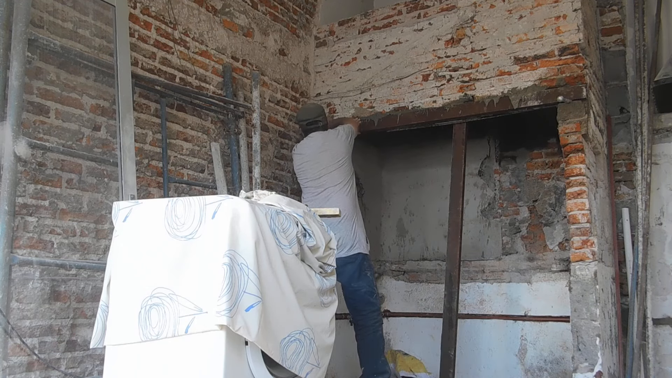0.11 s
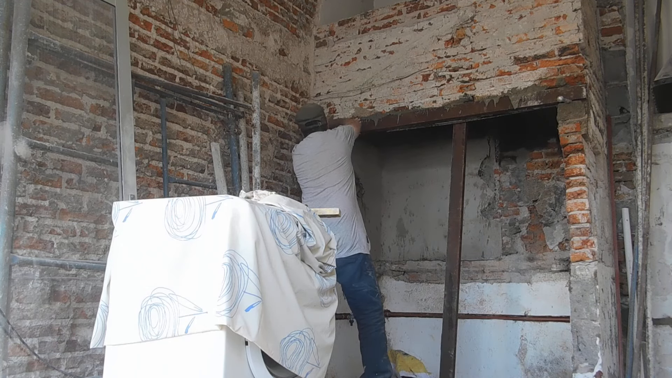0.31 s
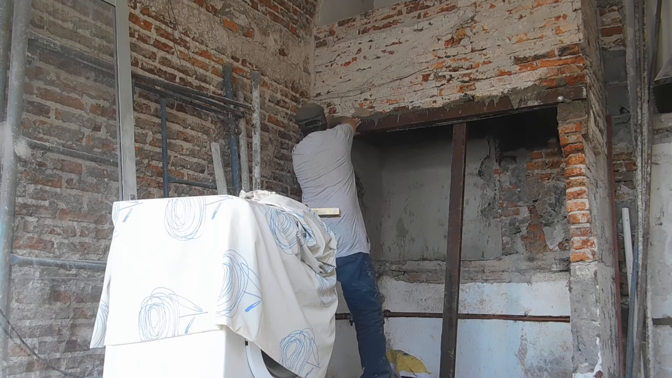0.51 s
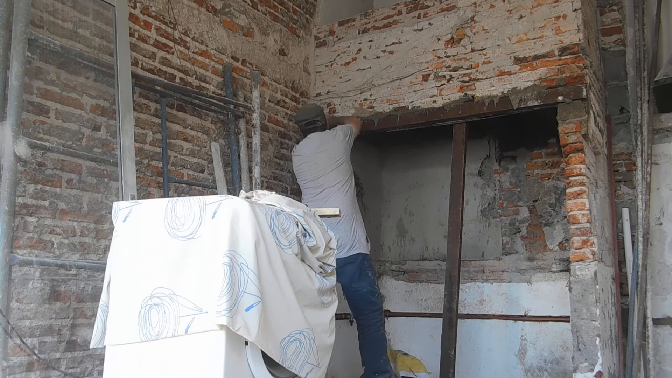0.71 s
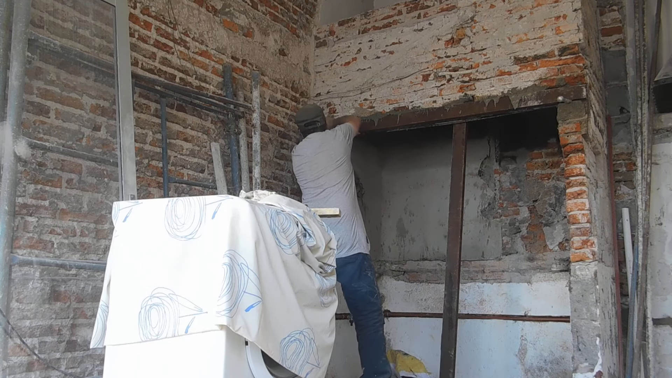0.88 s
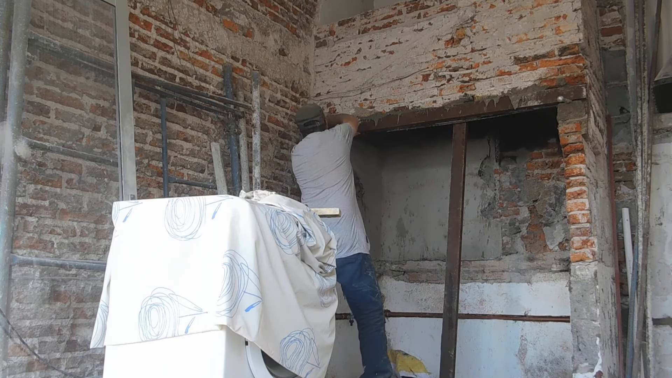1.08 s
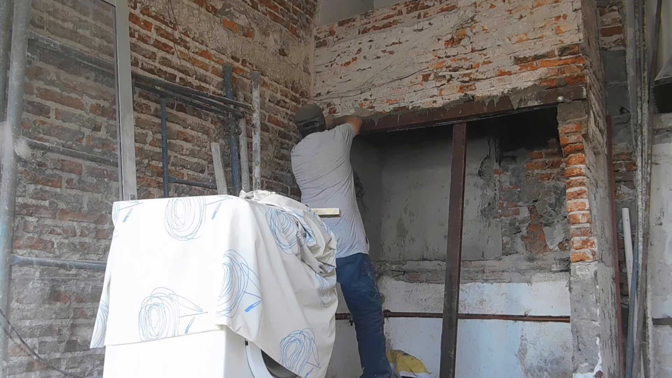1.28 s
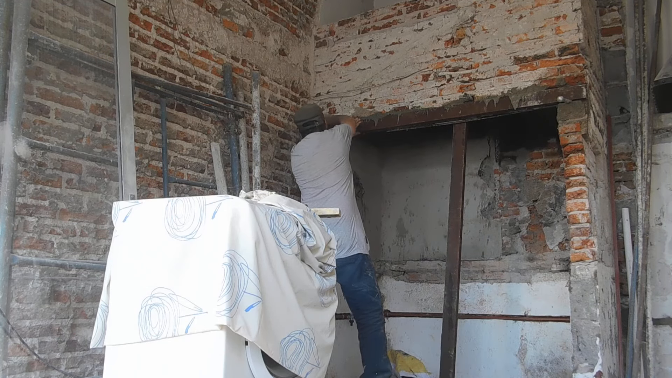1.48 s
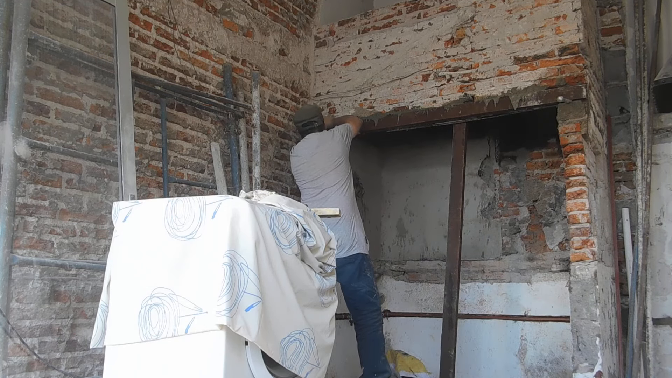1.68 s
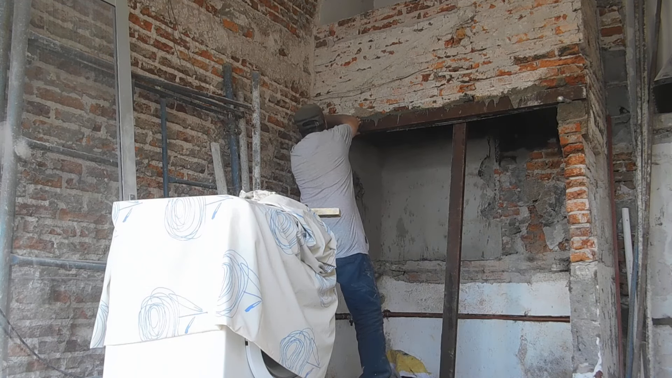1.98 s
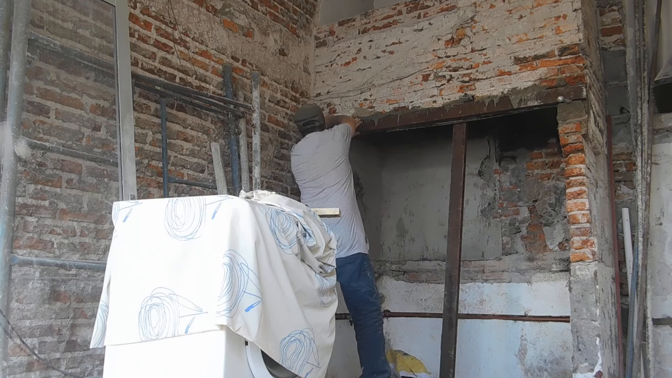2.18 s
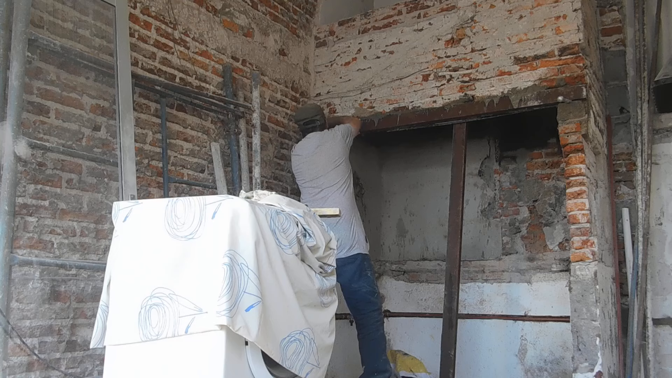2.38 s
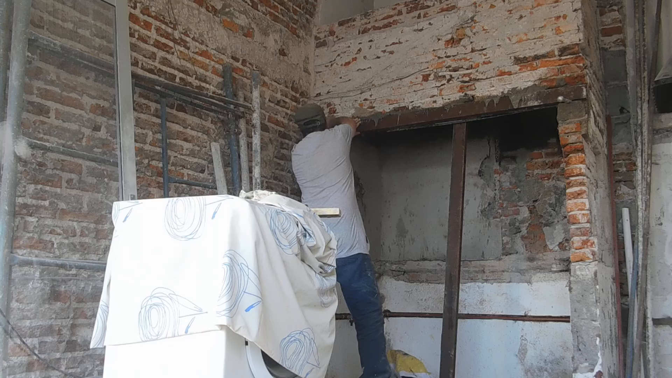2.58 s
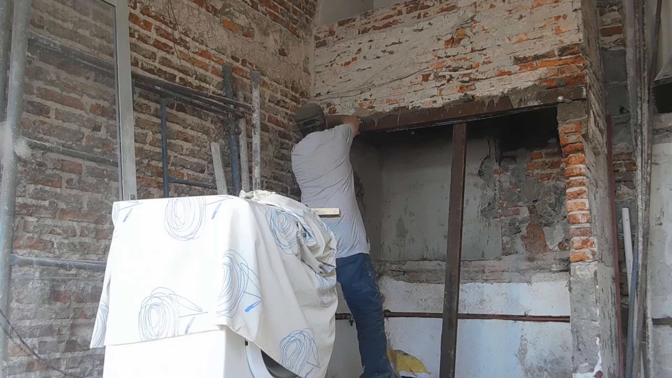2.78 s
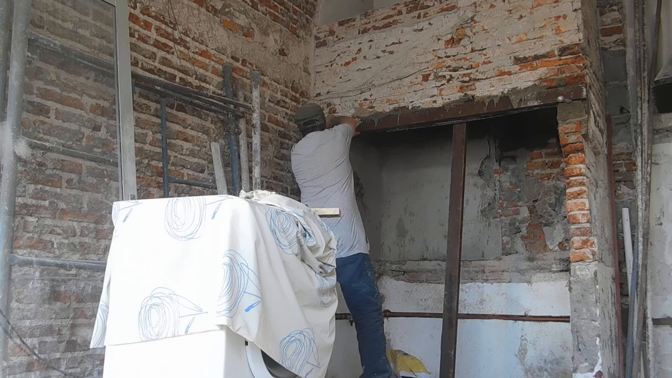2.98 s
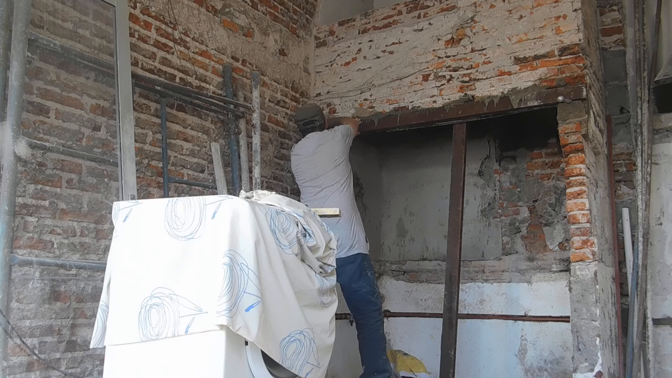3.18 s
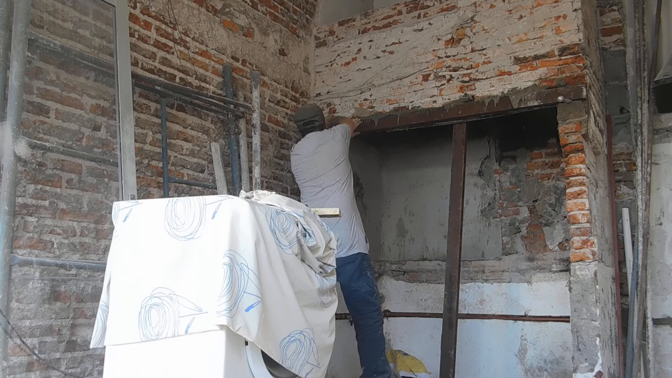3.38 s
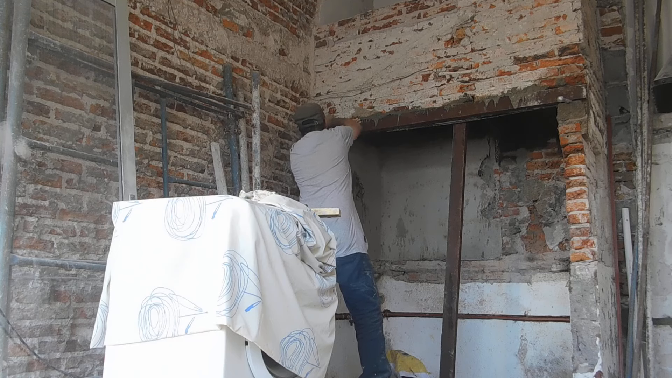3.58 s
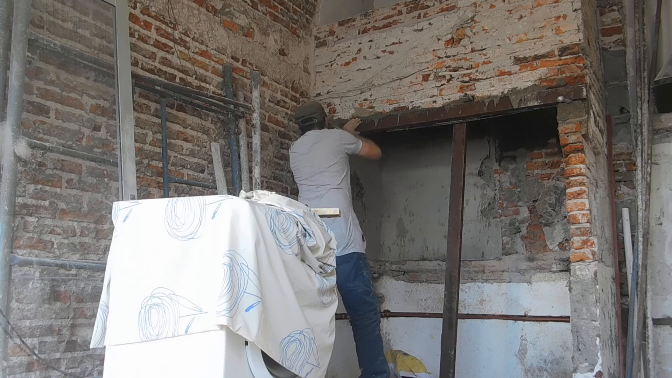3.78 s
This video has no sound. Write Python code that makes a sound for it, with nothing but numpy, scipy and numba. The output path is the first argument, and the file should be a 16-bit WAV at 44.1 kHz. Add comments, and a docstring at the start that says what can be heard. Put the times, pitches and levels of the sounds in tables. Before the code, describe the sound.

Hammer striking a steel beam in brickwork, nine steady ringing blows on a walled patio

```python
"""A hammer strikes a steel lintel set in brickwork on a walled patio: each blow is a crack and tick of shaped
noise over the decaying sine modes of beam and hammer head. Noise echoes from the walls return it, with a masonry thud.
Dust trickles after every blow, mortar grit falls in short bursts, and faint outdoor rumble and hiss lie beneath.
The microphone overloads; its gain control and limiter duck on the blows and creep back."""
import sys
import numpy as np
from scipy import signal
from scipy.fft import rfft, irfft
from scipy.io import wavfile
from scipy.ndimage import map_coordinates
from numba import njit

SR = 44100
rng = np.random.default_rng(int(sys.argv[2]) if len(sys.argv) > 2 else 0)


def unload_audio(sound):
    """Save the sound as a 16-bit wav file, at the path given as the first command line argument."""
    columns = np.transpose(np.atleast_2d(sound))
    # keep every value between -1 and 1, then stretch to whole-number steps
    steps = np.round(np.clip(columns, -1, 1) * 32767)
    wavfile.write(sys.argv[1], SR, steps.astype(np.int16))


def invert_db(level):
    """Linear amplitude ratio for a level in decibels (20 dB per decade), elementwise."""
    return 10 ** (np.asarray(level, dtype=float) / 20)


N = 171990
BLOW_N = SR * 3 // 4  # samples computed per blow and per echo response
RISE_S = 0.00054  # onset of ring, crack, tick and crack echo


def table(rows, hz, col):
    """Reads a column on a log-frequency axis."""
    rows = np.array(rows, float)
    return np.interp(np.log(np.maximum(hz, 1)), np.log(rows[:, 0]), rows[:, col])


def colour(x, db_of):
    """Filters by a dB function of frequency."""
    n = x.shape[-1]
    hz = np.arange(n // 2 + 1) * SR / n
    return irfft(rfft(x) * invert_db(db_of(hz)), n)


def unit(x):
    """Scales to an rms of 1."""
    return x / np.sqrt(np.mean(x ** 2))


def filtered(x, order, hz, kind):
    """Butterworth filter."""
    return signal.sosfilt(signal.butter(order, hz, kind, fs=SR, output="sos"), x)


# beam modes: pitch_hz
BEAM_PITCHES = [428, 550, 575, 618, 770, 806, 836, 1020, 1055, 1085, 1323, 1360, 1536, 1560, 1700, 1865,
                2007, 2370, 2635, 2821, 3100, 3240, 3560]
# beam modes, same order: relative_level_db, t60_s
BEAM_MODES = [(-25, 0.36), (-15.5, 0.22), (-6, 0.18), (-11, 0.22), (-12, 0.34), (0, 0.19), (-10.5, 0.32),
              (-22, 0.24), (-4.5, 0.22), (3.5, 0.12), (0, 0.17), (-10.5, 0.25), (-8.5, 0.2), (-8, 0.22),
              (-4, 0.18), (-7.5, 0.06), (-19.5, 0.36), (-16.5, 0.11), (-20, 0.13), (-12.5, 0.069),
              (-17.5, 0.22), (-14.5, 0.053), (-21, 0.11)]
# hammer head modes: pitch_hz, relative_level_db, t60_s
HEAD_MODES = [(4500, -28, .08), (4730, -34, .08), (4900, -29, 0.084), (5500, -35, 0.091), (5900, -39, .08),
              (6300, -27, .08), (6500, -28, 0.088), (6850, -30, .1)]
RING_DB, RING_SCATTER_DB, PITCH_SCATTER = 3, 1.4, 0.0019  # pitch scatter is a fraction


def ring(t, tilt_db, head_db):
    """Beam and hammer head as sums of decaying sine modes, scattered anew in level and pitch by each blow."""
    modes = np.vstack([np.column_stack([BEAM_PITCHES, BEAM_MODES]), HEAD_MODES])
    pitch_hz, level_db, t60_s = modes.T
    is_head = np.arange(len(modes)) >= len(BEAM_MODES)
    level_scatter, pitch_scatter = rng.standard_normal((2, len(modes)))
    level_db = level_db + RING_DB + RING_SCATTER_DB * level_scatter
    level_db = level_db + tilt_db * np.log2(pitch_hz / 1000) + head_db * is_head
    hz = pitch_hz * (1 + PITCH_SCATTER * pitch_scatter)
    sines = np.sin(2 * np.pi * hz[:, None] * t)
    return invert_db(level_db) @ (sines * invert_db(-60 * t / t60_s[:, None]))


# colour of the crack: freq_hz, relative_level_db
CRACK_COLOUR = [(120, -39), (250, -16), (500, -8), (800, 1.5), (1300, -2), (1800, -1.5), (2300, -8.5),
                (3500, -10), (4100, -20), (6500, -28), (8000, -34), (16000, -47)]
CRACK_DB, CRACK_DECAY_S = 16, 0.0029


def crack_tone(hz, tilt_db):
    """Crack spectrum, tilted above 1 kHz by the brightness of the blow."""
    return table(CRACK_COLOUR, hz, col=1) + tilt_db * np.log2(np.clip(hz, 1000, SR) / 1000)


def crack(t, crack_db, tilt_db):
    """Steel on steel: coloured noise dying in milliseconds."""
    noise = unit(colour(rng.standard_normal(BLOW_N), lambda hz: crack_tone(hz, tilt_db)))
    return invert_db(CRACK_DB + crack_db) * noise * np.exp(-t / CRACK_DECAY_S)


TICK_DB, TICK_DECAY_S, TICK_HZ = -1, 0.00072, 3000


def tick(t, crack_db):
    """Contact of steel on steel: a sub-millisecond burst of high-passed noise."""
    high = filtered(rng.standard_normal(BLOW_N), 1, TICK_HZ, "high")
    return invert_db(TICK_DB + crack_db) * high * np.exp(-t / TICK_DECAY_S)


THUD_HZ, THUD_DB, THUD_PEAK_S = 119, -18.5, 0.022


def thud(t, thud_db):
    """Shaken masonry: low-passed noise that swells and dies."""
    low = unit(filtered(rng.standard_normal(BLOW_N), 2, THUD_HZ, "low"))
    return invert_db(THUD_DB + thud_db) * low * t / THUD_PEAK_S * np.exp(1 - t / THUD_PEAK_S)


# wall echoes: freq_hz, t60_s, side_to_mid_ratio
WALL_ECHOES = [(99, 0.61, 0), (287, 0.51, 0), (700, 0.39, 0.3), (1340, 0.38, 0.58), (3130, 0.38, .8),
               (4300, 0.36, 1), (6900, 0.36, 0.3), (12800, .28, 0.77)]
ECHO_RISE_S = 0.0021


def walls(t):
    """Left and right echo response: half-octave noise bands, each dying at its own rate."""
    freq_hz = np.arange(BLOW_N // 2 + 1) * SR / BLOW_N
    white = rfft(rng.standard_normal((2, BLOW_N)))
    response = 0
    for hz in 40 * 2 ** (np.arange(18) / 2):
        octaves = np.abs(np.log2(np.maximum(freq_hz, 1) / hz))
        band = np.sin(np.pi / 2 * np.clip(1 - 2 * octaves, 0, 1)) ** 2
        mid, side = irfft(white * band, BLOW_N)
        side = table(WALL_ECHOES, hz, col=2) * side
        fade = invert_db(-60 * t / table(WALL_ECHOES, hz, col=1)) * (1 - np.exp(-t / ECHO_RISE_S))
        response = response + np.stack([mid + side, mid - side]) * fade / np.sqrt(np.sum(fade ** 2))
    return response


RING_ECHO_DB, CRACK_ECHO_DB = 4, -11


def echo(t, rise, beam, masonry, crack_db, tilt_db):
    """Walls return ring and thud by convolution, the crack as a coloured copy of their response."""
    room = walls(t)
    crack_echo = colour(room, lambda hz: crack_tone(hz, tilt_db)) * rise
    crack_echo = crack_echo / np.std(crack_echo[:, :BLOW_N // 16])
    source = invert_db(RING_ECHO_DB) * beam + masonry
    returned = signal.fftconvolve(source[None], room, axes=1)[:, :BLOW_N]
    return returned + invert_db(CRACK_DB + crack_db + CRACK_ECHO_DB) * crack_echo


# blows: start_s, force_db, crack_db, tilt_db_per_octave, thud_db, head_ring_db (all dB are offsets)
BLOW_TIMES = [(0.206, 1.5, 2.5, -0.5, -4, -4.5), (0.576, 0, 3.5, 0.5, -1.5, -6),
              (0.989, 2.5, 3.5, 1.5, -3.5, 6), (1.406, 2, 1.5, 1, -2.5, -8), (1.817, 3, 0.5, -2, -5, 2),
              (2.233, 1, 2.5, 2, -1.5, -5), (2.648, 1.5, 3, 3.5, -3, 2), (3.049, 1.5, 3, 2.5, -3.5, -2),
              (3.454, 1, 2, 3, -2, -3)]
# same columns; only its tail is heard
FIRST_BLOW = (-0.25, -4, 2.5, 1, 0, -6)
FORCE_DB, ARRIVE_S = 5.5, 0.0019  # added to every blow's force and start


def hammer():
    """Each blow sums ring, crack and tick with their own wall echoes; the thud is heard only in the echo."""
    lead = SR // 2
    out = np.zeros((2, N + lead + 2 * BLOW_N))
    t = np.arange(BLOW_N) / SR
    rise = 1 - np.exp(-(t / RISE_S) ** 2)
    end_fade = np.minimum(1, 10 * t[::-1])
    for start_s, force_db, crack_db, tilt_db, thud_db, head_db in [FIRST_BLOW] + list(BLOW_TIMES):
        i = int((start_s + ARRIVE_S) * SR) + lead
        beam = ring(t, tilt_db, head_db) * rise
        contact = (crack(t, crack_db, tilt_db) + tick(t, crack_db)) * rise
        returned = echo(t, rise, beam, thud(t, thud_db), crack_db, tilt_db)
        out[:, i:i + BLOW_N] += invert_db(FORCE_DB + force_db) * (beam + contact + returned) * end_fade
    return out[:, lead:lead + N]


# falls of grit: centre_s, half_length_s, level_db
GRIT_FALLS = [(0.86, 0.02, -57), (1.71, 0.037, -63), (2.466, .02, -61), (3.395, .008, -62),
              (3.758, 0.0035, -57), (3.864, 0.0035, -62)]
GRIT_HZ, DUST_DB, DUST_PEAK_S = 7000, -66, 0.13


def grit():
    """High-passed noise of uneven grains: dust swelling after every blow, and short bursts of mortar."""
    t = np.arange(N) / SR
    env = sum(invert_db(db) * np.exp(-((t - centre_s) / length_s) ** 2) for centre_s, length_s, db in GRIT_FALLS)
    for blow in [FIRST_BLOW] + list(BLOW_TIMES):
        after = np.maximum(t - blow[0], 0) / DUST_PEAK_S
        env = env + invert_db(DUST_DB) * after * np.exp(1 - after)
    grains = rng.standard_normal((2, N)) * invert_db(2.1 * rng.exponential(size=(2, N)))
    return env * unit(filtered(grains, 2, GRIT_HZ, "high"))


# air of the patio: freq_hz, relative_density_db
AIR_COLOUR = [(30, -8), (70, -9), (110, -10), (155, 1), (200, -22), (400, -15), (800, -11), (2000, -16),
              (5000, -21), (16000, -31)]
AIR_DB = -46.5


def air():
    """Faint outdoor rumble and hiss: steady coloured noise."""
    noise = rng.standard_normal((2, N))
    return invert_db(AIR_DB) * unit(colour(noise, lambda hz: table(AIR_COLOUR, hz, col=1)))


@njit
def follow(x, attack, release):
    """Level follower with separate rates up and down, as fractions per sample."""
    e, y = 1e-6, np.empty(len(x))
    for i in range(len(x)):
        e += (x[i] - e) * (attack if x[i] > e else release)
        y[i] = e
    return y


def duck(x, top_db, ratio, attack_s, release_s):
    """Turns both channels down as their followed peak level exceeds top_db."""
    level = follow(np.abs(x).max(axis=0), 1 / (attack_s * SR), 1 / (release_s * SR))
    return x * np.minimum(1, invert_db(top_db) / level) ** (1 - 1 / max(ratio, 1))


LEFT_LAG_S = 0.00003


def scene():
    """Blows, lagging slightly on the left, with grit and air."""
    blows = hammer()
    blows[0] = map_coordinates(blows[0], [np.arange(N) - LEFT_LAG_S * SR], mode="mirror")
    return blows + grit() + air()


def band_limit(x):
    """A steep low-pass at the top of the band."""
    return signal.sosfilt(signal.butter(12, 16340, fs=SR, output="sos"), x)


CAPSULE_DB, OUT_DB, HISS_DB, MIC_LOW_HZ = 13.5, -2.74, -64, 41.3


def record(dry):
    """The capsule rounds big peaks, gain control and limiter duck, the converter hisses and clips the rest."""
    soft = np.tanh(dry / invert_db(CAPSULE_DB)) * invert_db(CAPSULE_DB)
    ducked = duck(soft, top_db=-24, ratio=1.568, attack_s=0.0013, release_s=0.053) * invert_db(OUT_DB)
    limited = duck(ducked, top_db=-4, ratio=10, attack_s=0.003, release_s=0.15)
    hissy = limited + invert_db(HISS_DB) * rng.standard_normal(dry.shape)
    mix = np.clip(filtered(hissy, 2, MIC_LOW_HZ, "high"), -1, 1)
    return band_limit(mix)


dry = scene()
out = record(dry)
unload_audio(out)
```